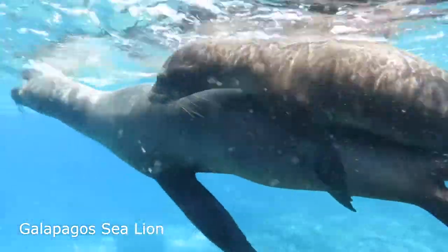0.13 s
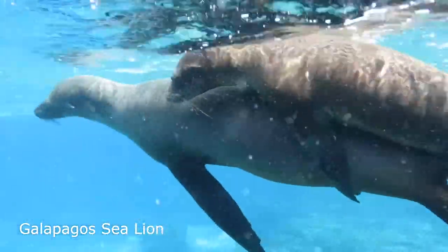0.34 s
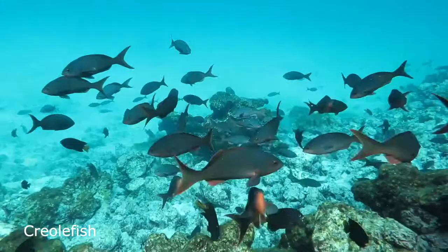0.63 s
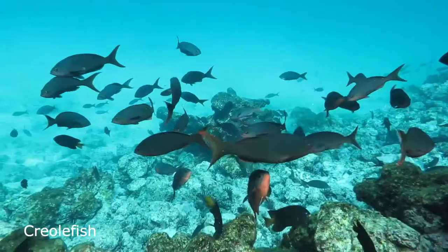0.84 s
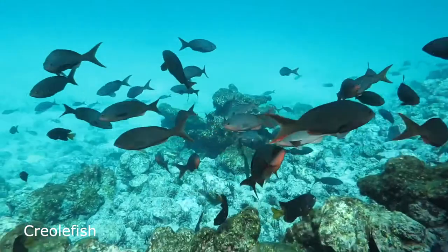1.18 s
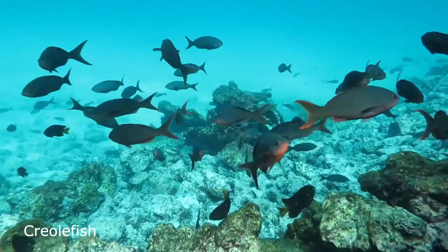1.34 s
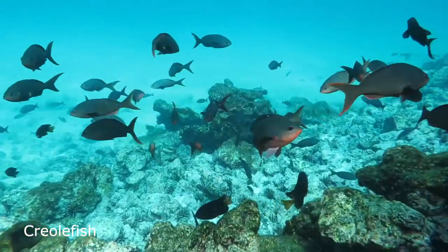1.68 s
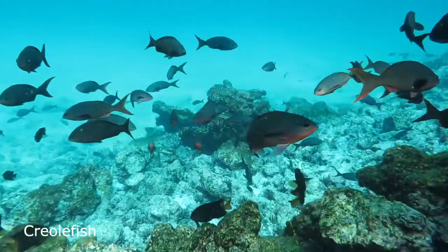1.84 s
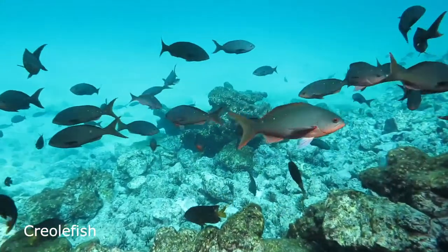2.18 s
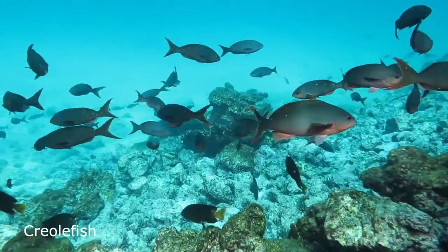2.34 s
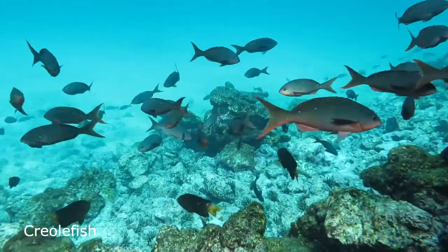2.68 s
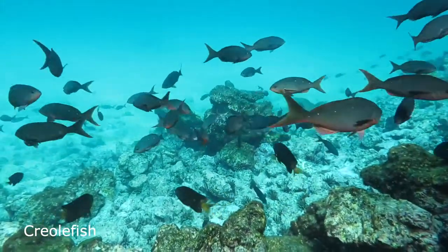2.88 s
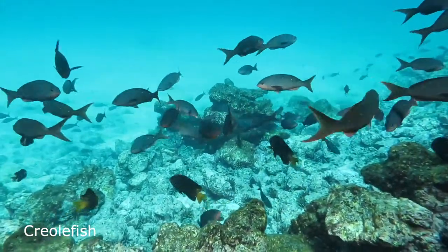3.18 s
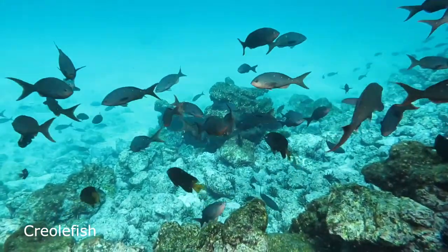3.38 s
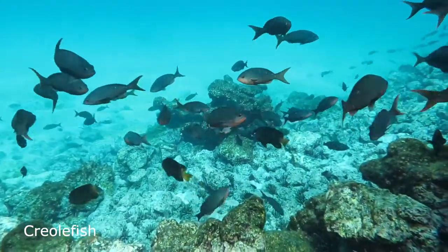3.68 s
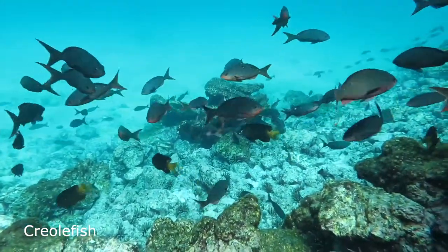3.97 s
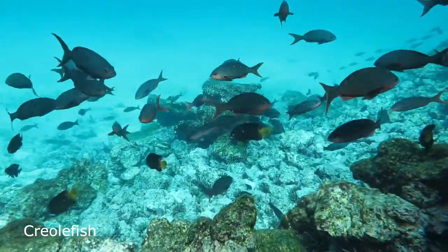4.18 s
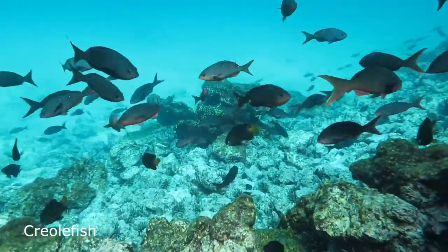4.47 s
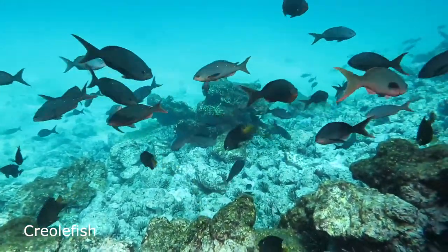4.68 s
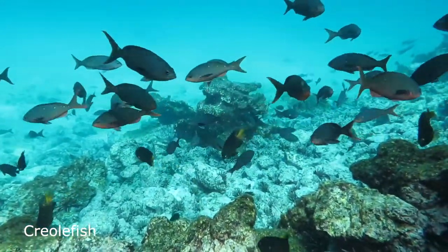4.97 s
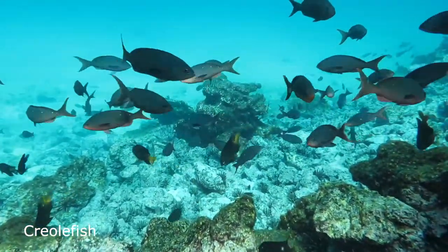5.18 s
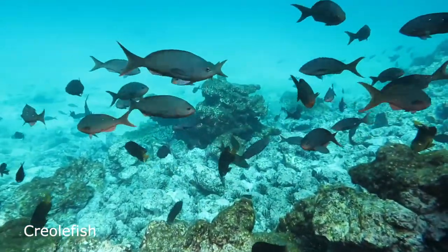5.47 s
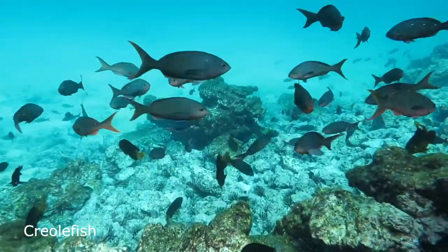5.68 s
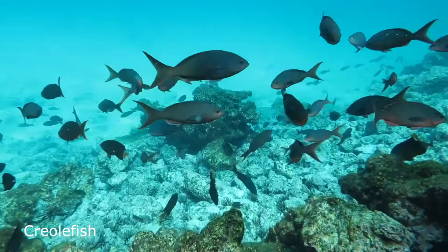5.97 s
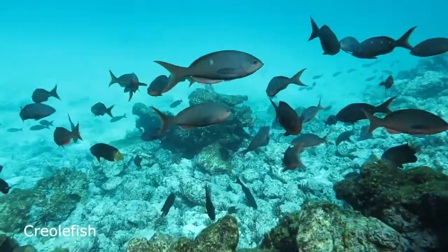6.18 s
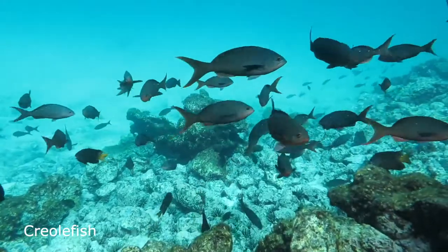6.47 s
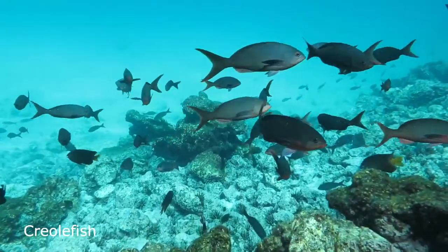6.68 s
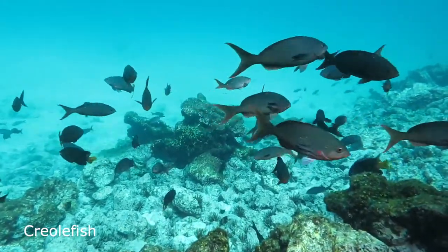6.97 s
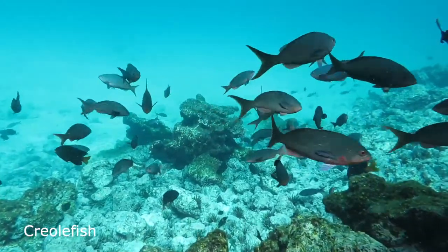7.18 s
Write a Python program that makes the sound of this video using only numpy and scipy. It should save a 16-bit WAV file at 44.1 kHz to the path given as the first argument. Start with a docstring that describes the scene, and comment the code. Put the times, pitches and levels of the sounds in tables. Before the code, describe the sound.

Underwater reef heard inside a watertight camera housing: shrimp click and crackle constantly over muffled water wash, with brief motor thrums and late knocks.

```python
"""A muffled wash of water and, in short runs, the thrum of a lens motor, while shrimp click and crackle over a
reef throughout. All is heard inside a watertight camera housing: filtered noise makes the water, a wavering
sine the hum. The motor makes one windowed sine shudder per frame. Each snap is a ring of housing modes,
a ping and filtered noise bursts. Near the end a hand bumps the housing three times: knock, ring, thud, rattle."""
import sys
import numpy as np
from scipy import signal
from scipy.fft import rfft, irfft, next_fast_len
from scipy.io import wavfile
from scipy.ndimage import map_coordinates

SR = 44100
rng = np.random.default_rng(int(sys.argv[2]) if len(sys.argv) > 2 else 0)


def wrap_up_sound(samples):
    """Save the sound to the file named by the first command line argument, as 16-bit audio."""
    columns = np.atleast_2d(samples).T
    # keep every value between -1 and 1, then stretch to whole-number steps
    tamed = np.clip(columns, -1, 1)
    steps = np.round(tamed * 32767).astype(np.int16)
    wavfile.write(sys.argv[1], SR, steps)


N = 323683
TOP_HZ = 16000  # band limit of the camera

# water spectra: f/Hz, relative level/dB
SLOSH_SPECTRUM = [(15, -3.5), (45, -1.5), (80, -0.5), (130, -9.5), (220, -12), (500, -44), (1000, -87)]
DRONE_SPECTRUM = [(60, -21.5), (150, -10.5), (210, -6.5), (270, -8), (320, -0.5), (360, 1), (400, -4),
                  (450, -7), (560, -25.5), (1000, -66)]
HISS_COMMON_SPECTRUM = [(30, -3), (250, 1.5), (600, 5.5), (850, 6), (1100, -6), (1280, 9), (1600, -3.5),
                        (2200, -3), (2700, -6), (3100, -7.5), (5500, -11), (8000, -20.5), (13000, -24.5),
                        (14200, -72)]
HISS_OPPOSED_SPECTRUM = [(30, -38), (120, 0.5), (330, 7), (700, 2), (1300, -1), (2600, -5.5), (3700, -8.5),
                         (6000, -14), (9000, -20.5), (13500, -15), (15200, -40), (16000, -56)]
# slosh envelope: t/s, level/dB
SLOSH_ENVELOPE = [(0.0, -55), (0.8, -66.5), (1.27, -57.5), (1.68, -58), (2.3, -66), (2.86, -63),
                  (3.25, -55), (3.74, -63), (4.97, -65), (5.23, -56), (6.19, -65.5), (6.75, -54.5),
                  (7.34, -55)]
# hollow drone envelope: t/s, level/dB before DRONE_TRIM_DB
DRONE_ENVELOPE = [(0.0, -53), (0.94, -53), (1.31, -49.5), (1.58, -50.5), (1.75, -53.5), (2.2, -50.5),
                  (2.7, -54), (3.26, -53.5), (3.5, -53.5), (3.62, -47), (3.95, -49.5), (4.2, -50),
                  (4.5, -52.5), (4.95, -54.5), (5.25, -53), (5.91, -54), (6.97, -52.5), (7.34, -54)]
DRONE_TRIM_DB = 1.0
# soft shoves of water on the housing: t/s, peak level/dB, Gaussian spread/s
WATER_SHOVES = [(.04, -51, .04), (2.17, -54, .04), (2.44, -50, .05), (5.62, -51, .035)]
# hiss and air levels, before the balance between left and right
HISS_COMMON_DB, HISS_OPPOSED_DB = -58.5, -55
CAVITY_HZ, CAVITY_WIDTH_HZ, CAVITY_COMMON_DB, CAVITY_OPPOSED_DB = 1030.3, 41.3, -58, -60
BALANCE_DB = 0.8  # left up, right down

# hum envelope: t/s, level/dB
HUM_ENVELOPE = [(3.45, -80), (3.56, -51), (3.65, -47), (3.8, -52), (3.95, -47), (4.05, -53), (4.18, -50),
                (4.3, -62), (4.5, -80)]
HUM_HZ, HUM_WAVER_HZ = 346, 7.27

# lens motor runs: start t/s, end t/s
MOTOR_RUNS = [(.006, .25), (1.031, 1.94), (2.961, 3.61), (5.065, 5.48), (6.304, 6.91), (7.134, 7.335)]
# motor step strength: t/s, level/dB before MOTOR_TRIM_DB
MOTOR_STRENGTH = [(.01, -37), (.08, -41), (.24, -36), (1.03, -36), (1.26, -38), (1.3, -47), (1.33, -34),
                  (1.46, -36.5), (1.5, -43), (1.53, -39), (1.7, -37.5), (1.73, -36), (1.86, -35.5),
                  (1.93, -38), (2.96, -35), (3.06, -36), (3.13, -39), (3.17, -35), (3.5, -35), (3.53, -47),
                  (3.57, -33), (3.6, -35.5), (5.07, -37), (5.1, -38), (5.13, -34), (5.4, -35.5),
                  (5.43, -43), (5.47, -36.5), (6.3, -35.5), (6.6, -39), (6.67, -36), (6.74, -44),
                  (6.82, -35), (6.9, -37), (7.13, -33), (7.17, -34.5), (7.33, -31.5)]
MOTOR_TRIM_DB = -2.5
FRAME_S = 1001 / 30000
STEP_SCATTER_DB, STEP_PITCH_SCATTER = 1.26, 0.037  # pitch scatter as a ratio

# free housing modes: f/Hz, level/dB, t60/s, left over right/dB
HOUSING_MODES = [(374, 5.5, .058, .5), (455, 2.5, .034, 1), (572, -3, .022, 3), (810, -16, .014, 0),
                 (1190, -1, .0115, 4), (1335, 2, .016, 2), (1540, -16, .008, 2), (1780, -15, .008, 2),
                 (2157, -5.5, .027, 2.5), (2340, -5, .013, -1), (2695, -1, .026, 2), (3400, -13, .038, 0),
                 (4500, -16, .011, 8)]

# colony: ring of about the faintest snaps, spread towards the stronger ones
COLONY_RING_DB, COLONY_SPREAD_DB = -47.5, 6
# over the ring: ping, and the strongest rattle and crack
COLONY_PING_DB, COLONY_RATTLE_MAX_DB, COLONY_CRACK_MAX_DB = -2, -9, -3

# bumps: t/s, ring level/dB, blow centre f/Hz, blow spread/octaves, time scale of the ring (pitch ratio),
# damping by the hand (ratio), twist level/dB, thud level/dB, rattle level/dB, knock f/Hz, knock level/dB
HOUSING_BUMPS = [(6.6345, -14, 760, 1.27, .97, 1, -16, 14.5, -21.5, 540, -19.5),
                 (6.8812, -21, 1500, 1.7, .995, 1.7, -33, -16, -27, 470, -20),
                 (6.9503, -6.5, 1760, .36, .95, .95, -24, -26, -39, 1750, -22.5),
                 (6.95273, -16, 1520, .5, .95, 1.1, -30, -47, -41, 1200, -27)]
# thud spectrum: f/Hz, relative level/dB
THUD_SPECTRUM = [(15, -12), (40, 3.5), (80, 7.5), (130, 6.5), (190, 4.5), (250, 3.5), (330, 4.5),
                 (500, -35), (680, -30.5), (850, -16), (1800, -26), (2600, -22), (3500, -27.5), (4200, -60),
                 (7000, -52), (12000, -71)]
TWIST_HZ, TWIST_OCTAVES = 2700, .55  # band in which a bump twists the shell
KNOCK_RISE_CYCLES = 0.45

# near snaps, levels as energies: t/s, ring level/dB, ring tilt/(dB/octave), second arrival delay/s,
# ping f/Hz, ping level/dB, common dry rattle level/dB, common bright crack level/dB
NEAR_SNAPS = [(0.137, -29, -1.0, 0.002, 2950.0, -40, -41, -41),
              (0.198, -22, -16.0, 0.0024, 4800, -33, -29, -38),
              (0.2355, -18.5, -4, 0.00238, 3700, -33, -28.5, -32.5),
              (0.293, -21, 1, 0.00244, 3700.0, -29, -36, -30),
              (0.304, -21, 8.0, 0.00048, 3830, -24, -27.0, -35),
              (0.4227, -18.5, -11, 0.002, 3660, -22, -37, -50.0),
              (0.5182, -21, -1, 0.00156, 2970.0, -29, -31.0, -38.5),
              (0.8975, -18, -10, 0.002, 2890.0, -32, -37, -42),
              (1.006, -25, -6, 0.002, 3500, -29, -32.5, -34),
              (1.2254, -24, 1, 0.0015, 3680.0, -31, -28.5, -36.0),
              (1.2406, -16, -8, 0.00035, 3700, -20, -24, -33.5),
              (1.363, -34.0, 6.0, 0.00188, 3810.0, -34, -31.5, -40),
              (1.3786, -29, 12.0, 0.0034, 3680.0, -37, -36, -48),
              (1.4381, -9.5, 2, 0.0006, 3010.0, -27, -30, -33.5),
              (1.5285, -4, -8, 0.0012, 2930, -11, -14, -16),
              (1.7502, -22.5, -6, 0.0021, 2860.0, -33, -37, -40),
              (1.779, -27.0, -10, 0.0011, 3790.0, -29, -36, -42.0),
              (1.796, -27, 0.0, 0.0013, 3700.0, -32, -34, -47),
              (1.8405, -23, 17, 0.001, 3770, -24, -28, -45),
              (1.904, -34, -10.0, 0.00092, 3040.0, -40, -37, -38),
              (1.92, -26, -5.0, 0.00088, 3700.0, -36, -40.5, -43),
              (1.933, -39.0, 6.0, 0.00238, 3750.0, -35, -43, -31),
              (1.949, -37.0, 4.0, 0.00094, 4800, -29, -36, -34.0),
              (1.9824, -23, 10, 0.00092, 2950.0, -26, -23, -41),
              (2.0148, -25.0, 5, 0.00146, 5500, -23, -31, -28.0),
              (2.196, -17.5, 24, 0.00176, 2780, -21, -31, -29.5),
              (2.218, -24, -3, 0.00066, 2890.0, -31, -34.5, -37),
              (2.2822, -18, 9.0, 0.00134, 3780, -22, -28.5, -39),
              (2.4254, -15, 10, 0.00058, 2950.0, -26, -22.5, -39),
              (2.441, -30.0, -6.0, 0.00174, 3790.0, -33, -35, -53),
              (2.552, -45.0, -6.0, 0.0024, 5880.0, -38, -35, -32.5),
              (2.9727, -22, -20, 0.00044, 5780, -14, -30.5, -26),
              (3.085, -24.5, 6, 0.00126, 2950.0, -29, -32.5, -39),
              (3.1323, 2, -15, 0.00044, 3040, -7, -15.5, -18.5),
              (3.25, -31, -6.0, 0.00162, 3750.0, -40, -39, -35.5),
              (3.2893, -19.5, -2, 0.00208, 2900, -24, -33.5, -39.5),
              (3.3895, -5, -3, 0.00031, 3050, -10, -10, -22.5),
              (3.4251, -17, 0, 0.0013, 3530, -22, -24.5, -30.0),
              (3.7609, -36, 6.0, 0.0013, 3750.0, -36, -37.5, -30),
              (3.828, -22.5, -17, 0.0012, 3830.0, -30, -36.5, -38),
              (3.9742, -45.0, -6.0, 0.00206, 5880.0, -38, -40, -32.0),
              (4.0846, -37.0, 11.0, 0.0026, 3700, -24, -24.5, -25),
              (4.2642, -22, -1, 0.0024, 2920, -26, -49.5, -58.0),
              (4.3314, -16, 23, 0.0013, 3120, -17, -29, -33.5),
              (4.3796, -27, 14.0, 0.00092, 3750, -28, -25.5, -32),
              (4.4523, -7.0, 7, 0.00057, 3060, -11, -27, -25.5),
              (4.5524, -39, 10.0, 0.00284, 3620, -37, -33, -35),
              (4.576, -29.5, 8.0, 0.00075, 3850.0, -38, -34, -45.0),
              (4.797, -32.0, 6.0, 0.0013, 3700.0, -34, -38, -59),
              (4.8275, -8, -2, 0.001, 3010, -6, -14, -25.5),
              (4.9342, -2.5, -5, 0.00122, 3920, -14, -18, -23.5),
              (5.037, -30, 16.0, 0.00254, 2950.0, -33, -34.5, -37),
              (5.125, -25.5, 5, 0.00062, 2910.0, -32, -48, -40.5),
              (5.227, -30, 1, 0.00202, 2950.0, -30, -36, -40),
              (5.3174, -19, -8, 0.001, 2970.0, -22, -37, -47.0),
              (5.379, -18.5, 6, 0.00046, 3850.0, -24, -18, -23.5),
              (5.445, -37, -13.0, 0.00298, 3760, -31, -32, -39.0),
              (5.481, -46.0, -17.0, 0.00298, 3830, -36, -31, -32.5),
              (5.592, -26, 0.0, 0.00256, 3800, -35, -41, -55.0),
              (5.74, -28.5, 2.0, 0.0019, 2930.0, -31, -39.5, -61.0),
              (5.996, -30.0, 6, 0.00162, 3800, -30, -37, -50),
              (6.1337, -14.0, 8, 0.00073, 2840, -23, -51, -60.0),
              (6.3088, -30.0, -6.0, 0.0026, 3450.0, -29, -35, -33.0),
              (6.4545, -29, 5.0, 0.0023, 3700.0, -36, -34.5, -33.5),
              (6.784, -47.0, -8.0, 0.00276, 3270.0, -45, -48, -38.5),
              (6.8402, -21.5, 4.0, 0.001, 2950.0, -28, -25.5, -26)]
RING_HZ, RING_OCTAVES, RING_TOP_HZ = 2080, 0.71, 3170  # band of modes a snap feeds
RING_DAMPING = 1.19  # decay rate over the free housing's
DETOUR_DB = -2.5  # second arrival over the direct one
PING_RISE_S, PING_DECAY_S = 0.0005, 0.0026
PING_COMMON_DB = -14  # over the opposed part
# shell response to rattles and cracks: f/Hz, relative level/dB
RATTLE_COMMON_SPECTRUM = [(500, -37), (1200, 7), (2400, 4), (3100, -5.5), (3400, 14.5), (3850, 1),
                          (4350, 9.5), (4900, 2.5), (5400, 6.5), (6300, -19), (9000, -43)]
RATTLE_OPPOSED_SPECTRUM = [(500, -21), (1500, -10), (2300, 1), (2750, -1), (3000, 10), (3350, 5),
                           (3680, 11), (4300, 4), (4900, -6), (6200, -4), (9000, -34)]
CRACK_COMMON_SPECTRUM = [(2500, -7), (6500, 4.5), (7900, 8), (8500, 2.5), (9900, 11), (10400, 7),
                         (11100, 9), (11700, 2), (12900, 15.5), (13900, -15), (16000, -13)]
CRACK_OPPOSED_SPECTRUM = [(2500, -10), (6200, 1), (7700, 2), (8300, -1), (9000, 5), (10900, -5), (11700, 2),
                          (13000, -12), (13700, -7), (15000, 1), (16000, -48)]
# crack tilt, dB per octave
NEAR_CRACK_TILT_DB, COLONY_CRACK_TILT_DB, CRACK_TILT_SCATTER_DB = 6, -2.5, 10
SMEAR_S = 0.0028  # main decay of a burst's arrivals


def amp(db):
    """Decibels to gain."""
    return 10 ** (np.asarray(db) / 20)


def unit(x):
    """Scale to rms 1."""
    return x / np.sqrt(np.mean(x ** 2) + 1e-20)


def colour(points):
    """Gain as a function of frequency, dB interpolated on a log axis."""
    f_hz, db = np.transpose(points)
    return lambda hz: amp(np.interp(np.log(hz + 1), np.log(f_hz), db))


def filtered(x, response):
    """Apply a real frequency response, padded against wrap-around."""
    n = x.shape[-1]
    m = next_fast_len(n + SR // 4)
    spectrum = rfft(x, m) * response(np.fft.rfftfreq(m, 1 / SR))
    return irfft(spectrum, m)[..., :n]


def noise(response):
    """Coloured noise, rms 1."""
    return unit(filtered(rng.standard_normal(N), response))


def impulse(points, size=1024):
    """Minimum-phase impulse response of a spectrum, energy 1, by folding the cepstrum."""
    cepstrum = irfft(np.log(colour(points)(np.fft.rfftfreq(size, 1 / SR))))
    cepstrum[1:size // 2] *= 2
    cepstrum[size // 2 + 1:] = 0
    h = irfft(np.exp(rfft(cepstrum)))
    return h / np.linalg.norm(h)


def wobble(rate_hz):
    """Smooth random curve through rate_hz knots a second."""
    knots = rng.standard_normal(int(N * rate_hz / SR) + 4)
    return map_coordinates(knots, [np.arange(N) * rate_hz / SR])


def envelope(t, points):
    """Interpolate a table of times and levels."""
    return np.interp(t, *np.transpose(points))


def stereo(common, opposed):
    """Left and right from their common and opposed parts."""
    return np.array([common + opposed, common - opposed])


def add(track, start_s, sound):
    """Mix a sound into a track, cut at the track's end."""
    i = max(0, round(start_s * SR))
    part = track[..., i:i + sound.shape[-1]]
    part += sound[..., :part.shape[-1]]


def housing(t, centre_hz, octaves, damping, tilt_db=0, top_hz=TOP_HZ):
    """Decaying shell modes, fed in a band around the blow's centre; neighbours swing in opposite directions."""
    hz, db, t60_s, pan_db = np.transpose(HOUSING_MODES)[:, :, None]
    away_octaves = np.log2(hz / centre_hz)
    band = np.exp(-.5 * (away_octaves / octaves) ** 4)
    tilt = amp(tilt_db * np.clip(away_octaves, -1, .5))
    fed = band * tilt / np.hypot(1, (hz / top_hz) ** 12)
    scatter_db = rng.standard_normal(hz.shape)
    sign = (-1) ** np.arange(len(hz))[:, None]
    decay = amp(db + scatter_db - 60 * damping * t / t60_s)
    modes = sign * fed * decay * np.sin(2 * np.pi * hz * t)
    left, right = (modes * amp(pan_db / 2)).sum(0), (modes * amp(-pan_db / 2)).sum(0)
    return np.array([left, right]) * (1 - np.exp(-t / 0.002))


def burst(t, tilt_db=0):
    """Many short paths smear a spike into decaying noise: common and opposed part, energy 1 before tilt."""
    decay = np.exp(-t / SMEAR_S) + 0.15 * np.exp(-t / 0.0063)
    paths = rng.standard_normal((2, len(t))) * (1 - np.exp(-t / 0.00058)) * decay
    paths /= np.linalg.norm(paths, axis=1, keepdims=True)
    hz = np.fft.rfftfreq(len(t), 1 / SR)
    treble_octaves = np.log2(np.clip(hz, 7000, 14000) / 10500)
    return irfft(rfft(paths) * amp(tilt_db * treble_octaves), len(t))


def walls(bursts, common, opposed, opposed_db):
    """The shell colours bursts and moves the two microphones partly against each other."""
    through = lambda x, points: signal.fftconvolve(x, impulse(points))[:N]
    return stereo(through(bursts[0], common), amp(opposed_db) * through(bursts[1], opposed))


def water():
    """Slosh, hollow drone and hiss as shaped noise through the shell; the enclosed air resonates in a narrow band."""
    t = np.arange(N) / SR
    shove = sum(amp(db) * np.exp(-.5 * ((t - s) / spread_s) ** 2) for s, db, spread_s in WATER_SHOVES)
    slosh_gain = amp(envelope(t, SLOSH_ENVELOPE) + 2.6 * wobble(5.3)) + shove
    slosh = slosh_gain * noise(colour(SLOSH_SPECTRUM))
    drone_gain = amp(envelope(t, DRONE_ENVELOPE) + DRONE_TRIM_DB + 0.15 * wobble(9.7))
    drone = drone_gain * noise(colour(DRONE_SPECTRUM))
    hiss_common = amp(HISS_COMMON_DB) * noise(colour(HISS_COMMON_SPECTRUM))
    hiss_opposed = amp(HISS_OPPOSED_DB) * noise(colour(HISS_OPPOSED_SPECTRUM))
    hiss = amp(1.8 * wobble(24)) * stereo(hiss_common, hiss_opposed)
    peak = lambda hz: 1 / (1 + ((hz - CAVITY_HZ) / CAVITY_WIDTH_HZ) ** 2)
    air = stereo(amp(CAVITY_COMMON_DB) * noise(peak), amp(CAVITY_OPPOSED_DB) * noise(peak))
    balance = amp([[BALANCE_DB], [-BALANCE_DB]])
    return slosh + drone + (hiss + air) * balance


def hum():
    """A sine of wavering pitch and level swells up mid-scene."""
    level_db = envelope(np.arange(N) / SR, HUM_ENVELOPE) + 0.92 * wobble(12)
    pitch_hz = HUM_HZ + HUM_WAVER_HZ * wobble(12)
    return amp(level_db) * unit(np.sin(2 * np.pi * np.cumsum(pitch_hz) / SR))


def motor(step_hz, length_s, jitter_s, mount_db):
    """Each lens step is a brief windowed shudder that also stirs the lower housing modes through the mount."""
    t, out = np.arange(SR // 20) / SR, np.zeros((2, N))
    swell = np.sin(np.pi * np.minimum(t / length_s, 1)) ** 2
    for start_s, end_s in MOTOR_RUNS:
        for s in np.arange(start_s, end_s, FRAME_S):
            late, size, phase_turns, pitch = rng.standard_normal(4)
            hz = step_hz * (1 + STEP_PITCH_SCATTER * pitch)
            shudder = swell * np.sin(2 * np.pi * (hz * t + phase_turns))
            gain = amp(envelope(s, MOTOR_STRENGTH) + MOTOR_TRIM_DB + STEP_SCATTER_DB * size)
            step_s = s + jitter_s * late
            add(out, step_s - .005, gain * shudder)
            add(out, step_s, gain * amp(mount_db) * housing(t, centre_hz=680, octaves=.8, damping=2))
    return out


def colony(count=460):
    """Distant snaps at random times: many faint, a few stronger, some dull and some bright."""
    when, size, lean, detour, pitch, dry, bright = rng.random((count, 7)).T
    ring_db = COLONY_RING_DB - COLONY_SPREAD_DB * np.log(size + 0.05)
    ring_tilt_db = 24 * (lean - .5)
    ping_hz = 2900 + 2600 * pitch ** 2
    ping_db = ring_db + COLONY_PING_DB
    rattle_db = ring_db + COLONY_RATTLE_MAX_DB - 8 * dry
    crack_db = ring_db + COLONY_CRACK_MAX_DB - 19 * bright
    rows = [when * N / SR, ring_db, ring_tilt_db, 0.00294 * detour, ping_hz, ping_db, rattle_db, crack_db]
    return snaps(np.transpose(rows), COLONY_CRACK_TILT_DB)


def bumps():
    """A blow knocks dead, rings, twists and rattles the shell, and shoves the whole camera in a damped thud."""
    t = np.arange(SR // 6) / SR
    out, rattles = np.zeros((2, 2, N))
    thud = impulse(THUD_SPECTRUM, size=4096)
    for (s, ring_db, centre_hz, octaves, pitch, damping,
         twist_db, thud_db, rattle_db, knock_hz, knock_db) in HOUSING_BUMPS:
        rise = t * knock_hz / KNOCK_RISE_CYCLES
        knock = rise * np.exp(1 - rise) * np.sin(2 * np.pi * knock_hz * t)
        add(out, s, amp(knock_db) * knock)
        add(out, s, amp(ring_db) * housing(pitch * t, centre_hz, octaves, damping))
        # the twist moves the microphones against each other
        twist = housing(pitch * t, TWIST_HZ, TWIST_OCTAVES, damping=1.7, tilt_db=-15).mean(0)
        add(out, s, amp(twist_db) * stereo(0, twist))
        add(out, s, amp(thud_db) * thud)
        add(rattles, s, amp(rattle_db) * burst(t))
    return out + walls(rattles, RATTLE_COMMON_SPECTRUM, RATTLE_OPPOSED_SPECTRUM, opposed_db=8)


def snaps(rows, crack_tilt_db):
    """A collapsing bubble rings the housing directly and by a detour; a wall pings, rattle and crack on top."""
    t = np.arange(SR // 25) / SR
    hz = np.fft.rfftfreq(len(t), 1 / SR)
    rings, rattles, cracks = np.zeros((3, 2, N))
    for s, ring_db, ring_tilt_db, detour_s, ping_hz, ping_db, rattle_db, crack_db in rows:
        ring = housing(t, RING_HZ, RING_OCTAVES, RING_DAMPING, ring_tilt_db, RING_TOP_HZ)
        # the second arrival strengthens some modes and cancels others
        arrivals = 1 + amp(DETOUR_DB) * np.exp(-2j * np.pi * hz * detour_s)
        ring = irfft(rfft(ring) * arrivals, len(t))
        add(rings, s, amp(ring_db) * ring / np.linalg.norm(ring))
        ping = np.sin(2 * np.pi * ping_hz * t) * np.exp(-t / PING_DECAY_S) * (1 - np.exp(-t / PING_RISE_S))
        ping = stereo(amp(PING_COMMON_DB) * ping, ping)
        add(rings, s, amp(ping_db) * ping / np.linalg.norm(ping))
        add(rattles, s, amp(rattle_db) * burst(t))
        tilt_db = crack_tilt_db + CRACK_TILT_SCATTER_DB * rng.standard_normal()
        add(cracks, s, amp(crack_db) * burst(t, tilt_db))
    rattle = walls(rattles, RATTLE_COMMON_SPECTRUM, RATTLE_OPPOSED_SPECTRUM, opposed_db=1.0)
    crack = walls(cracks, CRACK_COMMON_SPECTRUM, CRACK_OPPOSED_SPECTRUM, opposed_db=7.0)
    return rings + rattle + crack


def scene():
    """Everything as heard inside the housing."""
    camera = motor(step_hz=154.3, length_s=0.025, jitter_s=0.00229, mount_db=-1.0) + bumps()
    shrimp = colony() + snaps(NEAR_SNAPS, NEAR_CRACK_TILT_DB)
    return water() + hum() + camera + shrimp


def record(dry):
    """The camera keeps nothing above its band limit."""
    return filtered(dry, lambda hz: hz < TOP_HZ)


dry = scene()
out = record(dry)
wrap_up_sound(out)
```